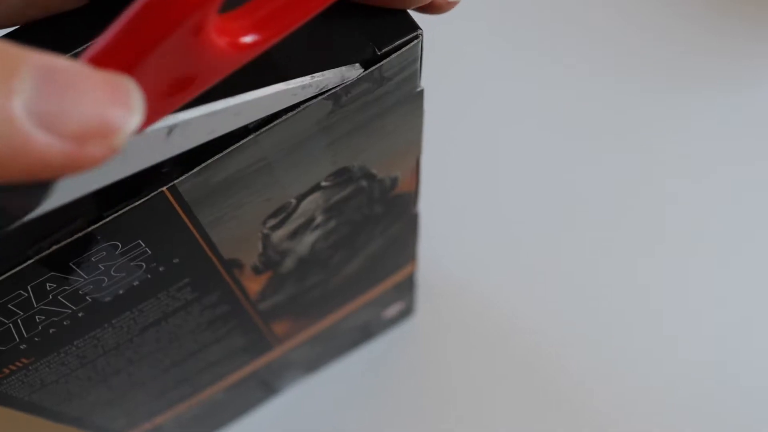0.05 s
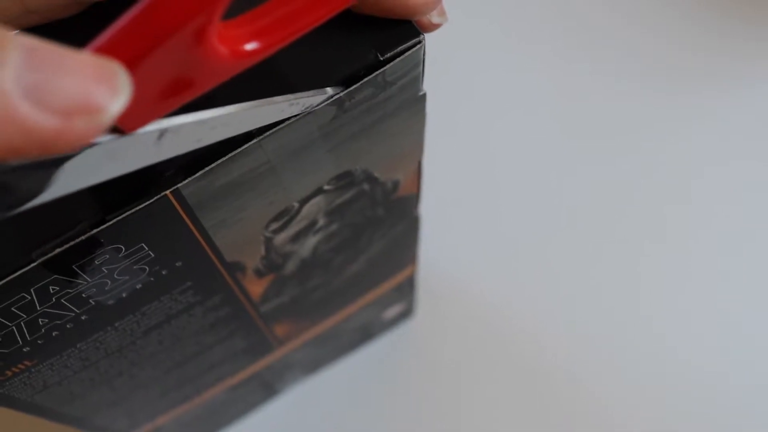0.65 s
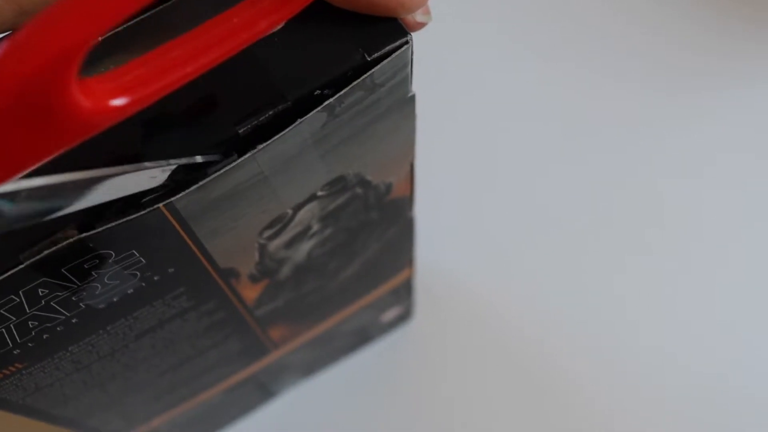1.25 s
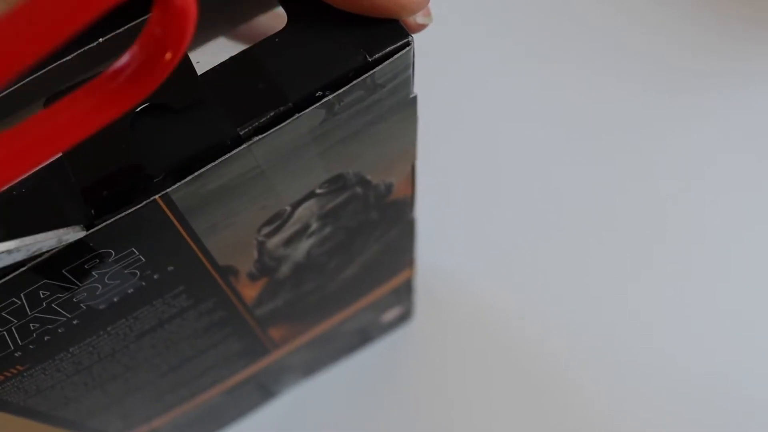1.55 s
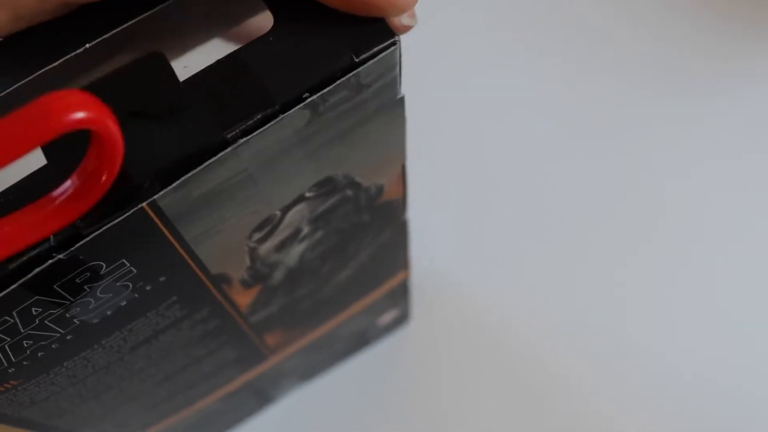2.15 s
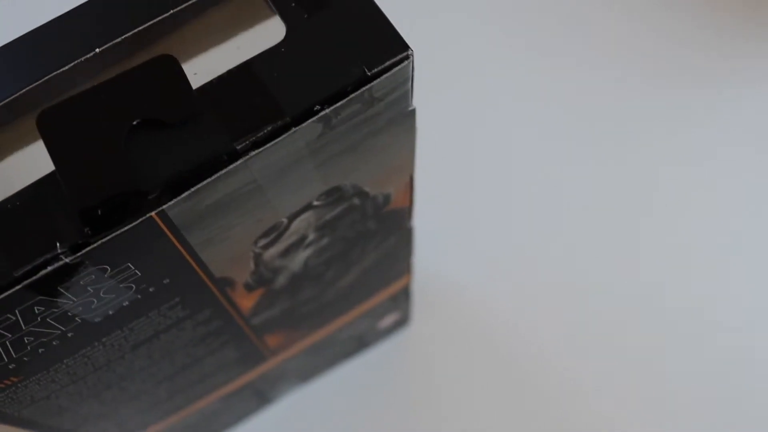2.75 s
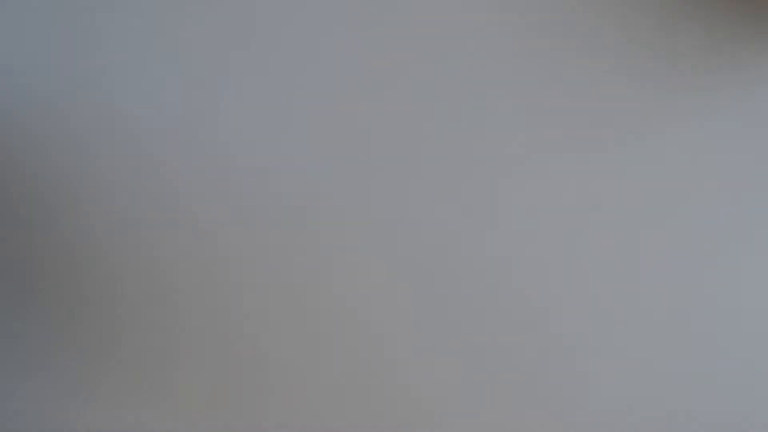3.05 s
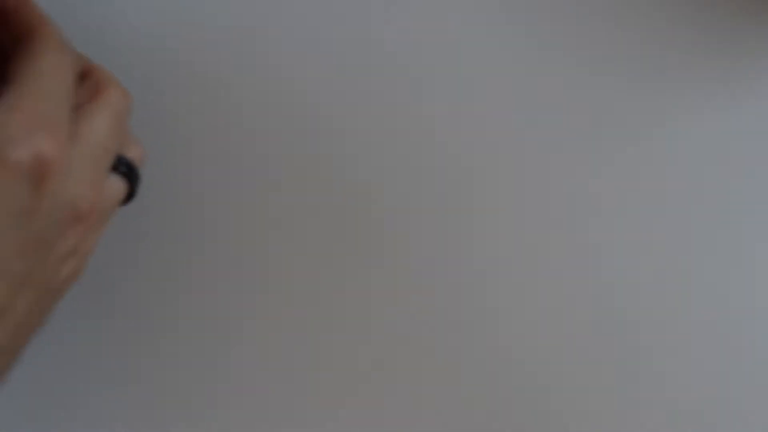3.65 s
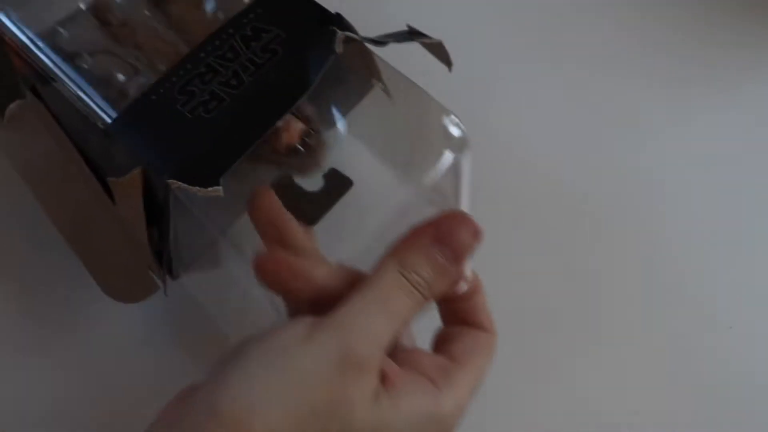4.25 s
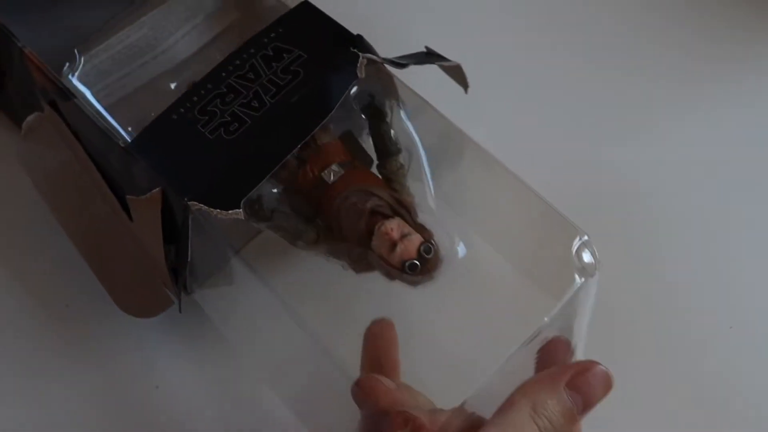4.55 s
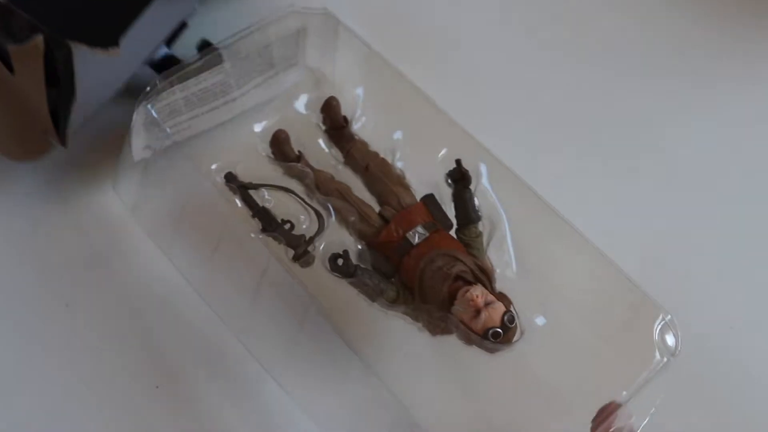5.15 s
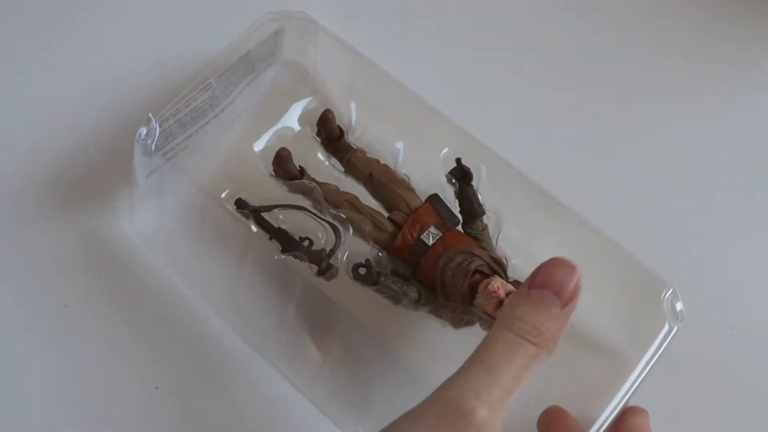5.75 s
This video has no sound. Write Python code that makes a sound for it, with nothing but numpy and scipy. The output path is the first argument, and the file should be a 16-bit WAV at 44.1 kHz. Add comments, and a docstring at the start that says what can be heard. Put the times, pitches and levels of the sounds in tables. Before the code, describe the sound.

A blade rubs and squeaks along a small box, with sharp cardboard snaps, then crackly sliding and handling of a plastic tray.

```python
"""A faint hum fills a small bare room, heard through a close stereo microphone.
From the start, a scissor blade rubs and squeaks through the tape of a small cardboard box.
It levers the flap open: tape and card give way with two loud snaps, near 0.8 s and 2.1 s.
Near 3 s the flap is pulled back, then a thin plastic tray scrapes out, catching and buckling.
The tray lands and is handled until the end, at 6 s."""
import sys
import numpy as np
from scipy import signal
from scipy.fft import rfft, irfft, next_fast_len
from scipy.io import wavfile

SR = 44100
rng = np.random.default_rng(int(sys.argv[2]) if len(sys.argv) > 2 else 0)


def unload_wav(signal):
    """Save mono or channel-first audio to the path in sys.argv[1] as 16-bit WAV at rate SR, clipped to [-1, 1]."""
    wavfile.write(
        sys.argv[1],
        SR,
        np.round(np.clip(np.atleast_2d(signal).T, -1, 1) * 32767).astype(np.int16),
    )


N = 264996
TIME = np.arange(N) / SR
SPOT_Q = 3.04  # how sharply a touched spot rings: a higher Q rings longer


def from_db(db):
    """Turn decibels into a number to multiply by."""
    return 10 ** (np.asarray(db) / 20)


def rms_one(x):
    """Scale a sound to an average strength (rms) of 1."""
    return x / np.sqrt(np.mean(x ** 2) + 1e-20)


def at_hz(points, hz):
    """Read between the rows of a table, on a scale of octaves."""
    f, value = np.transpose(points)
    return np.interp(np.log(np.maximum(hz, 1)), np.log(f), value)


def drift(turns_per_s):
    """A random wander with a typical size of 1."""
    knots = rng.standard_normal(4000)
    return rms_one(np.interp(TIME * turns_per_s, np.arange(len(knots)), knots))


def colour(x, points):
    """Make some pitches louder and others softer (a minimum-phase filter)."""
    n = next_fast_len(x.shape[-1] + 4096, True)
    gains = from_db(at_hz(points, np.fft.rfftfreq(n, 1 / SR)))
    cepstrum = irfft(np.log(gains), n)
    cepstrum[1:n // 2] *= 2  # folded so that nothing rings before it is struck
    cepstrum[n // 2 + 1:] = 0
    return irfft(rfft(x, n) * np.exp(rfft(cepstrum)), n)[..., :x.shape[-1]]


def resonate(x, hz, q, lift_db):
    """A ringing part lifts its own pitch out of the sound."""
    return x + (from_db(lift_db) - 1) * signal.lfilter(*signal.iirpeak(hz, q, fs=SR), x)


def panels(force, tone, rings):
    """A push is heard through thin walls that ring at their own pitches."""
    x = colour(force, tone)
    for hz, width_hz, lift_db in rings:
        x = resonate(x, hz, hz / width_hz, lift_db)
    return x


def split(x, edges_hz):
    """Cut a sound into pitch bands, lowest first."""
    bands = []
    for hz in edges_hz:
        low, high = (signal.butter(2, hz, kind, fs=SR, output="sos") for kind in ("low", "high"))
        bands.append(signal.sosfilt(np.tile(low, (2, 1)), x))
        x = signal.sosfilt(np.tile(high, (2, 1)), x)
    return bands + [x]


# How alike left and right are in the room: f/Hz, likeness (0 to 1)
LIKENESS = [(100, 0.83), (500, 0.78), (1200, 0.42), (2500, 0.031), (14000, 0)]
def all_round_noise(size):
    """Noise from all sides: left and right are alike in the bass, unrelated in the treble."""
    alike = np.clip(at_hz(LIKENESS, np.fft.rfftfreq(size, 1 / SR)), -1, 1)
    mid, side = rfft(rng.standard_normal((2, size)))  # mid: what both ears share; side: how they differ
    return rms_one(irfft(np.sqrt(1 + alike) * mid + np.sqrt(1 - alike) * side * [[1], [-1]], size))


# The tone of the room's air: f/Hz, relative level/dB
AIR_TONE = [(15, -34), (25, -17.5), (123, -12.5), (223, -9), (531, -21.5), (659, -4.5), (734, -19),
            (1040, -18), (12200, -31)]
# The notes of the hum: f/Hz, level/dB
HUM_NOTES = [(118.4, -70.5), (183, -67), (672.9, -69.5)]
def background(air_db):
    """Room air and the slightly wavering hum of a far appliance."""
    hum = sum(np.sqrt(2) * from_db(db) * np.sin(2 * np.pi * hz * TIME + 0.26 * drift(2))
              for hz, db in HUM_NOTES)
    return from_db(air_db) * rms_one(colour(all_round_noise(N), AIR_TONE)) + hum


def pressure(t, start, end, swell_db, rise_share=0.08, fall_db_per_s=402.5):
    """A stroke takes hold, swells or eases evenly, and lets go."""
    progress = np.clip((t - start) / max(end - start, 1 / SR), 0, 1)
    release_db = fall_db_per_s * np.clip(t - end, 0, 1)
    return np.minimum(progress / rise_share, 1) * from_db(swell_db * (progress - .5) - release_db)


def catches(per_s=330, low_hz=1696, high_hz=7997, ring_s=0.0056, spread_db=1.5):
    """Sliding edges catch, and each catch rings briefly at its own pitch; gives mid and side."""
    size = 4096
    t, out = np.arange(size) / SR, np.zeros((2, N + size))
    for when, pitch, strength, angle in rng.random((int(per_s * N / SR), 4)):
        hz, at = low_hz * (high_hz / low_hz) ** pitch, int(when * N)
        ring = rms_one(np.sin(2 * np.pi * hz * t) * t * np.exp(-t / ring_s))
        direction = np.cos(2 * np.pi * angle), np.sin(2 * np.pi * angle)
        gain = from_db(spread_db * min(-np.log(1 - strength), np.pi))
        out[:, at:at + size] += np.outer(direction, ring) * gain
    return rms_one(out[:, :N])


def rubbing(strokes, tone, rings, slips_per_s, smooth, catch_db, judder_db, ring_db, gain_db):
    """Tiny slips, catches and a smooth hiss shake the panels, stroke by stroke; gives mid and side."""
    shape = 2, N
    sizes = rng.standard_normal(shape) * from_db(np.minimum(rng.exponential(1, shape), 4))
    slips = rms_one(sizes * (rng.random(shape) < slips_per_s / SR))
    friction = slips + smooth * rng.standard_normal(shape) + from_db(catch_db) * catches()
    unsteady_hand = from_db(judder_db * drift(turns_per_s=120))
    shaking = panels(friction * unsteady_hand, tone, rings)
    bands = np.array([rms_one(band) for band in split(shaking, edges_hz=(700, 4000))])
    out = np.zeros(shape)
    for start, end, db, swell_db, boom_db, hiss_db, ring_hz in strokes:
        span = slice(int(start * SR), int(end * SR) + SR // 4)
        low, middle, high = bands[..., span]
        blend = from_db(boom_db) * low + middle + from_db(hiss_db) * high
        sound = resonate(blend, ring_hz, SPOT_Q, ring_db)
        out[:, span] += from_db(db + gain_db) * pressure(TIME[span], start, end, swell_db) * sound
    return out


# The tone of a push on cardboard: f/Hz, relative level/dB
CARD_TONE = [(30, -15), (65, -7), (110, 6.5), (280, 6), (500, 10), (1400, 0.5), (4200, -7.5), (6500, -14.5),
             (10000, -24), (15000, -25.5)]
# Where the box walls ring: f/Hz, width/Hz, lift/dB
CARD_RINGS = [(185, 45, 5), (332, 33.6, 3), (378, 37, 5.5), (470, 140, 3.5)]
# Strokes on the box; boom is extra bass, hiss is extra treble, f is the ring of the touched spot:
# start t/s, end t/s, relative level/dB, swell/dB, boom/dB, hiss/dB, f/Hz
BLADE_RUBS = [(0.0, 0.38, -60.5, -13, -1.5, -4.5, 1590), (0.09, 0.13, -59.5, 5, 10, -1, 149),
              (0.38, 0.45, -57, 6.5, 6, -1.5, 5430), (0.595, 0.665, -42, -1.5, 6.5, 2.5, 342),
              (0.85, 1.12, -40, -14, 2.5, -1.5, 490), (1.24, 1.35, -45, 1.5, 0, 2.5, 4750),
              (1.595, 1.648, -42.5, 18.5, 3.5, -7.5, 4740), (2.14, 2.31, -45, 0.5, 5.5, 6.5, 523),
              (2.312, 2.372, -35, -9, -17.5, 2.5, 11900)]
def blade_slitting():
    """The blade and fingers rub along tape and card."""
    return rubbing(BLADE_RUBS, CARD_TONE, CARD_RINGS, slips_per_s=1000, smooth=0.9,
                   catch_db=-7.5, judder_db=1, ring_db=5.5, gain_db=-6.0)


# Squeaks of card, blade and plastic: start t/s, end t/s, f/Hz, level/dB
SQUEAK_NOTES = [(0.042, 0.36, 1430, -61), (0.615, 0.627, 6730, -41.5), (1.266, 1.343, 4550, -60),
                (2.141, 2.287, 3980, -46), (2.16, 2.28, 4620, -48), (2.312, 2.312, 3030, -29),
                (3.023, 3.154, 2370, -45), (4.468, 4.82, 2740, -63.5), (5.15, 5.4, 4270, -59)]
def squeaks(q=30):
    """A dragging edge sticks and slips, keeping one narrow pitch ringing; gives mid and side."""
    out = np.zeros((2, N))
    for start, end, hz, db in SQUEAK_NOTES:
        span = slice(int(start * SR), int(end * SR) + SR // 4)
        friction = rng.standard_normal((2, SR))
        tone = rms_one(signal.lfilter(*signal.iirpeak(hz, q, fs=SR), friction))
        grip = pressure(TIME[span], start, end, 0)
        out[:, span] += from_db(db) * grip * tone[:, :len(grip)]
    return out


def hits(table, tone, rings, snap, top_db, gain_db, grain_db=7.0, tear_s=0.00023):
    """Each hit is one sharp release, then a short crumble as fibres and creases give way."""
    size = 4096
    t, out = np.arange(size) / SR, np.zeros(N + size)
    starts, db, thump_db, bright_db, crumble_s, spots_hz = np.transpose(table)
    chance = rng.standard_normal((len(table), 2, size))
    grains = chance[:, 0] * from_db(grain_db * np.minimum(chance[:, 1], 2))
    force = grains * np.exp(-t / crumble_s[:, None]) * (1 - np.exp(-t / tear_s))
    force /= np.linalg.norm(force, axis=1, keepdims=True)
    force[:, 0] += snap  # the sharp release
    struck = np.array([resonate(push, hz, SPOT_Q, lift_db=9) for push, hz in zip(force, spots_hz)])
    bands = split(panels(struck, tone, rings), edges_hz=(500, 1500, 6000))
    bands_db = db + thump_db, db - bright_db, db, db + bright_db + top_db
    sounds = 0
    for band, band_db in zip(bands, bands_db):
        strength = np.linalg.norm(band, axis=1) / np.sqrt(SR / 100)  # as if packed into 10 ms
        sounds = sounds + band * (from_db(band_db) / strength)[:, None]
    for start, sound in zip(starts, sounds):
        at = int(start * SR)
        out[at:at + size] += sound
    return from_db(gain_db) * out[:N]


# Snaps of the box; thump is extra bass, f is the ring of the struck spot:
# t/s, relative level/dB, thump/dB, brightness/dB, crumble time/s, f/Hz
CARD_SNAPS = [(0.641, -38, 4, -1.5, 0.0065, 375), (0.8305, -26, -3, -0.5, 0.0054, 5530),
              (0.8395, -17, -5.5, 2, 0.0026, 3900), (0.8498, -20, 4, 1.5, 0.0027, 5250),
              (0.858, -26.5, -20, 3, 0.0024, 4740), (1.1598, -41.5, 3, 4.5, 0.0036, 8100),
              (1.2395, -32, -21, -1.5, 0.0064, 2470), (1.36, -41.5, 7, -4.5, 0.017, 390),
              (1.4435, -43, 3, -2.5, 0.0057, 13800), (1.478, -61, 21, -11, 0.008, 446),
              (1.5028, -49, 16.5, -6, 0.014, 415), (1.646, -41, 7.5, -9.5, 0.0056, 4920),
              (1.817, -51, -16, -1, 0.006, 2480), (1.9466, -47, 11.5, -6.5, 0.018, 185),
              (2.1186, -26.5, 1, 5.5, 0.02, 970), (2.1236, -20.5, -14.5, 3.5, 0.0041, 960),
              (2.1342, -24.5, -15, 10, 0.00081, 14400), (2.1378, -20.5, -11, 4.5, 0.0021, 2930),
              (2.1458, -36.5, -6, 9, 0.0022, 4100), (2.592, -38, -5, 15.5, 0.0046, 13950)]
def box_snapping():
    """Tape and flap give way suddenly and the box walls ring."""
    return hits(CARD_SNAPS, CARD_TONE, CARD_RINGS, snap=0.4, top_db=-1, gain_db=-1.7)


# The tone of a push on the tray: f/Hz, relative level/dB
PLASTIC_TONE = [(30, -32), (65, -20), (140, -11), (280, -3.5), (600, 2.5), (1100, 2), (2400, -1),
                (3600, -3.5), (7000, -11), (11000, -15.5), (15000, -17.5)]
# Where the tray walls ring: f/Hz, width/Hz, lift/dB
PLASTIC_RINGS = [(181, 14, 5.5), (466, 27, 5.6), (634, 66, 6), (843, 57, 4.2), (986, 200, 4.2),
                 (1700, 86, 2)]
# Slides of flap and tray: start t/s, end t/s, relative level/dB, swell/dB, boom/dB, hiss/dB, f/Hz
TRAY_SLIDES = [(2.892, 3.0, -44.5, 4, -0.5, -0.5, 443), (3.01, 3.19, -39, -16.5, 0, -6.5, 726),
               (3.19, 3.34, -35, 9.5, -15, -6.5, 2150), (3.39, 3.50, -43.5, -21, -0.5, -3.5, 526),
               (3.48, 3.72, -49, 4, -5.5, -6.5, 527), (3.612, 3.634, -49, 11, -8, 1, 11900),
               (3.72, 3.98, -38, -4, -2, -6.5, 1810), (3.97, 4.35, -34.5, -0.5, -2, -5.5, 1860),
               (4.35, 4.45, -47, 3, -7, -3, 640), (4.43, 4.92, -48, 2.5, -8.5, -2.5, 910),
               (4.91, 5.05, -44.5, 13, -3, -2, 740), (5.05, 5.085, -23, -0.5, -15, -1.5, 1110),
               (5.14, 5.28, -49.5, 10, -5, -3.5, 2350), (5.30, 5.395, -40, 18.5, 2.5, -6.5, 764),
               (5.43, 5.78, -48, -2, -8, -4.5, 905), (5.58, 5.69, -48.5, -8, -33, 1.5, 1010),
               (5.77, 5.885, -48, 2, 1, 1.5, 1230), (5.88, 6.0, -51, 11, 3, -23, 930)]
def tray_sliding():
    """Flap and tray scrape along card, table and fingers."""
    return rubbing(TRAY_SLIDES, PLASTIC_TONE, PLASTIC_RINGS, slips_per_s=1800, smooth=1.0,
                   catch_db=-8.5, judder_db=1.2, ring_db=3.5, gain_db=-2.0)


# Knocks of flap and tray: t/s, relative level/dB, thump/dB, brightness/dB, crumble time/s, f/Hz
TRAY_HITS = [(3.0112, -14.5, -5.5, 5, 0.0052, 910), (3.124, -34.5, 5.5, 8, 0.0064, 2330),
             (3.2784, -35, -1, -1, 0.0019, 1100), (3.2958, -29.5, -15, 1, 0.013, 2860),
             (3.3597, -26, -5, -4, 0.024, 2350), (3.3897, -29.5, -1.5, 15.5, 0.004, 2500),
             (3.633, -31.5, -3, 14, 0.0079, 4330), (3.7334, -30, -16, -2, 0.0065, 2270),
             (3.7912, -26, -6, -1, 0.0054, 1870), (3.8766, -31.5, 6, 13, 0.017, 132),
             (3.9955, -28.5, 10, -6.5, 0.0057, 166), (4.0297, -24.5, -1.5, -1.5, 0.0069, 1850),
             (4.1065, -28, -17, 1.5, 0.0042, 3550), (4.174, -31, -13, 0, 0.014, 4500),
             (4.3315, -31, 5, 2, 0.013, 1190), (4.362, -47.5, 19.5, -19.5, 0.013, 141),
             (4.833, -47, -29, -8.5, 0.0038, 1210), (4.8952, -37.5, -5, 1.5, 0.004, 955),
             (4.9696, -29.5, -4, 1, 0.016, 770), (5.0519, -36, -23, 18, 0.015, 1100),
             (5.0873, -22.5, -1.5, -4, 0.0013, 368), (5.0935, -29.5, 3, -22, 0.009, 516),
             (5.3751, -38.5, -5, -13.5, 0.004, 1130), (5.39, -43, 14.5, -20, 0.015, 390),
             (5.5697, -25, -11.5, 2, 0.0068, 6070), (5.7752, -32.5, -3, 7.5, 0.018, 3230),
             (5.8371, -30.5, 4.5, -3.5, 0.0087, 577)]
def tray_knocking():
    """The flap folds back, then the thin tray catches, buckles and lands."""
    return hits(TRAY_HITS, PLASTIC_TONE, PLASTIC_RINGS, snap=0.39, top_db=-10.5, gain_db=-2.0)


def scatter(clicks, gain_db, fade_s):
    """Table and moving hands bounce each click differently to left and right; gives the side signal."""
    size = 1024
    paths = np.array([np.subtract(*all_round_noise(size)) for _ in range(6)])
    paths *= np.exp(-np.arange(size) / SR / fade_s)
    paths = split(paths, edges_hz=[650])[1]  # lower sounds bend round the hands
    paths /= np.linalg.norm(paths, axis=1, keepdims=True)
    shares = np.array([drift(turns_per_s=12) for _ in paths])
    shares /= np.linalg.norm(shares, axis=0)
    bounces = signal.fftconvolve(clicks[None], paths, axes=1)[:, :N]
    return from_db(gain_db) * np.sum(shares * bounces, axis=0)


# Where the hands work: t/s, left minus right level/dB
HAND_POSITION = [(1.3, -1.5), (2.45, -3), (2.59, 10), (2.9, 1), (4.5, -1.5)]
def place(mid, side, lag_samples):
    """Sound reaches the left of the microphone first and leans to where the hands work."""
    left = mid + side
    right = np.pad(mid - side, (lag_samples, 0))[:N]
    lean_db = np.interp(TIME, *np.transpose(HAND_POSITION))
    return np.array([left * from_db(lean_db / 2), right * from_db(-lean_db / 2)])


# How long echoes take to fade by 60 dB: f/Hz, t/s
ECHO_TIMES = [(150, 0.66), (1000, 0.45), (3000, 0.5), (14000, 0.18)]
# How strong the echoes are: f/Hz, relative level/dB
ECHO_LEVELS = [(100, -10), (450, -1), (1000, -8), (3000, -6.5), (7000, -11.5), (14000, -14.5)]
def room(x, build_up_s):
    """Bare walls send back a blur of echoes that die sooner in the treble."""
    t = np.arange(SR) / SR
    edges_hz = 200 * 2. ** np.arange(7)
    centres_hz = np.append(edges_hz, 2 * edges_hz[-1]) / np.sqrt(2)
    build_up = 1 - np.exp(-(t / build_up_s) ** 2)
    echoes = 0
    for hz, noise in zip(centres_hz, split(all_round_noise(SR), edges_hz)):
        fade = from_db(-60 * t / at_hz(ECHO_TIMES, hz)) * build_up
        echoes = echoes + noise * fade / np.linalg.norm(fade) * from_db(at_hz(ECHO_LEVELS, hz))
    return signal.fftconvolve(x[None], echoes, axes=1)[:, :N]


def scene():
    """Box first, then the tray, in the same room."""
    clicks = box_snapping() + tray_knocking()
    rub_mid, rub_side = blade_slitting() + tray_sliding() + squeaks()
    mid = clicks + rub_mid
    # a rubbing edge is wide, so its treble differs between left and right
    rub_width = from_db(-2) * split(rub_side, edges_hz=[1150])[1]
    side = scatter(clicks, gain_db=-1.5, fade_s=0.0009) + rub_width
    return place(mid, side, lag_samples=4) + room(mid, build_up_s=0.0015) + background(air_db=-56)


def record(dry):
    """Any peak past full scale is clipped, then the highest treble is cut."""
    cutoff_hz = 16100
    treble_cut = signal.ellip(10, .1, 70, cutoff_hz, fs=SR, output="sos")
    return signal.sosfilt(treble_cut, np.clip(dry, -1, 1))


dry = scene()
out = record(dry)
unload_wav(out)
```